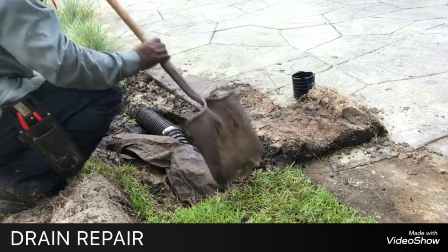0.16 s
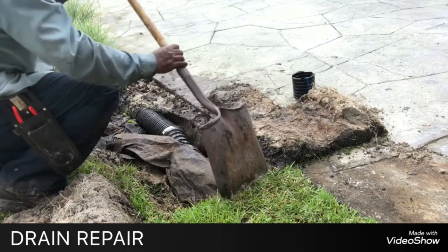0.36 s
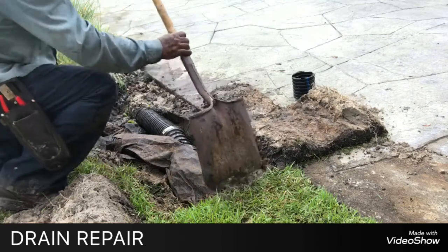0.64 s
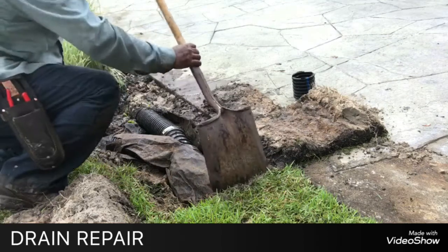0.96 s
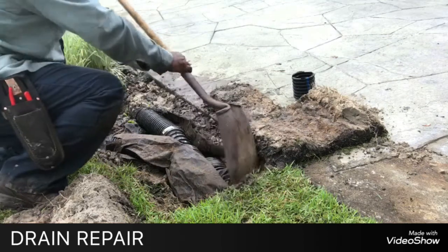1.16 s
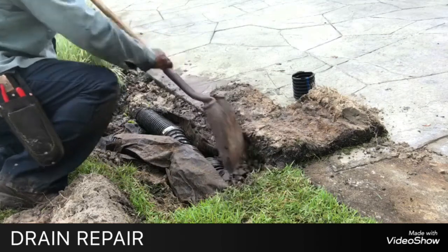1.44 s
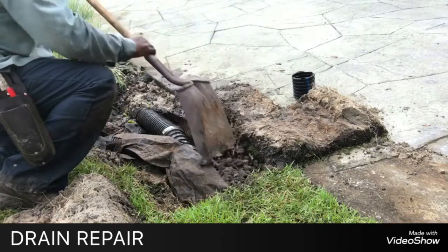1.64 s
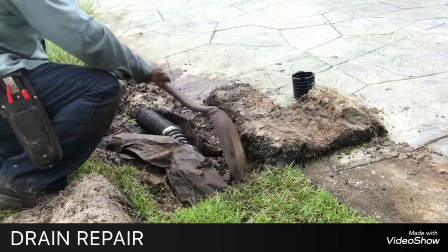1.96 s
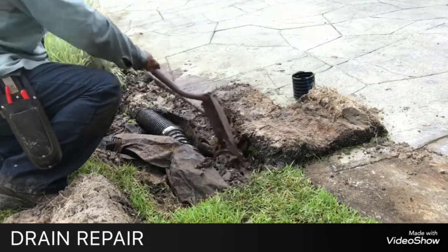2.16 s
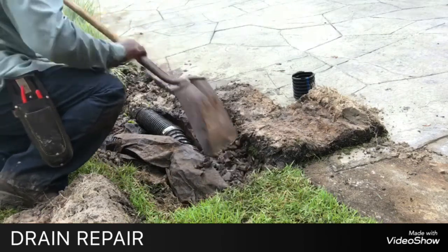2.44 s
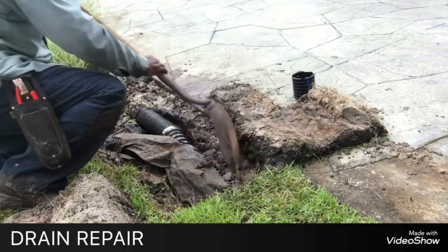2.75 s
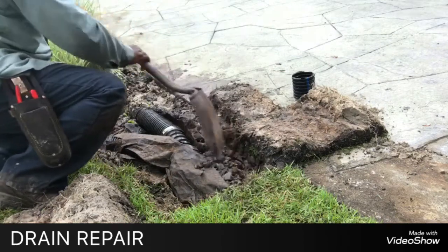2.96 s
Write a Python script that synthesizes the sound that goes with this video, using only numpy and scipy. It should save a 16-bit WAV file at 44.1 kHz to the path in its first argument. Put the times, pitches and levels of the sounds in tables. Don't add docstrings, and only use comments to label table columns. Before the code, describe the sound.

A steel shovel scrapes gritty soil, close and dry, outdoors. Faint scuffs come first, then a hard double knock near 0.85 seconds and a rasping, ringing drag from 1.05 to 1.6. Clods crumble and thump softly on hollow pipe around 1.7. Another scrape runs 1.9 to 2.3, then quiet pattering; loud clanking strokes start at 2.7 and last to the end. Distant engines hum over faint traffic and breeze.

```python
import sys
import numpy as np
from scipy import signal
from scipy.fft import rfft, irfft, next_fast_len
from scipy.io import wavfile
from scipy.ndimage import uniform_filter1d, map_coordinates

SR = 44100
rng = np.random.default_rng(int(sys.argv[2]) if len(sys.argv) > 2 else 0)


def magnitude_from_level(level_db):
    exponent = np.asarray(level_db, float) / 20
    return 10 ** exponent


def to_wav(s):
    ch = np.atleast_2d(s).T
    pcm = np.round(np.clip(ch, -1, 1) * 32767)
    wavfile.write(sys.argv[1], SR, pcm.astype(np.int16))


N = 136710
TIME = np.arange(N) / SR

# pitch in Hz, width in Hz, level in dB.
BLADE_MODES = [(2060, 50, 1), (1900, 42, -8), (2400, 70, -4), (2883, 90, -7.5), (3260, 50, -0.5),
               (3490, 34, -5), (4003, 56, -2), (4560, 77, -0.5), (5370, 110, 2.5), (5800, 89, 1),
               (6350, 53, -1.5), (8180, 190, -12), (9600, 210, -0.5)]
# frequency in Hz, level in dB per Hz.
GRIT_COLOUR = [(200, -21.5), (500, -15.5), (900, -10), (1500, -5.5), (2300, -6), (5500, -7.5),
               (8000, -14.5), (15800, -17.5)]
TREBLE_DB, RING_DB, SOIL_DB, OTHERS_DB = range(1, 5)
OTHER_MODES_DB = -8


def scraping():
    # time in
    # seconds, pressure in dB.
    strokes = [
        [(0, -55), (.2, -57.5), (.25, -80)],
        [(.33, -62), (.36, -55), (.45, -59)],
        [(.462, -43), (.5, -44.5), (.53, -47.5), (.545, -66)],
        [(.59, -60), (.63, -53.5), (.7, -65), (.76, -78)],
        [(.834, -35), (.87, -21.5), (.89, -45.5), (.93, -40.5)],
        [(.93, -48.5), (1.09, -35), (1.13, -26), (1.17, -24), (1.22, -22.5), (1.25, -19), (1.3, -23),
         (1.34, -28), (1.45, -33)],
        [(1.45, -37), (1.48, -27), (1.56, -25.5), (1.59, -36), (1.63, -65)],
        [(1.63, -45.5), (1.75, -40.5), (1.91, -57)],
        [(1.917, -26), (1.935, -22.5), (1.95, -40), (1.98, -28), (2.01, -40), (2.03, -24.5), (2.09, -25.5),
         (2.14, -20.5), (2.19, -25.5), (2.27, -29.5), (2.31, -47.5)],
        [(2.31, -49.5), (2.495, -50), (2.52, -55.5), (2.6, -69), (2.71, -48.5)],
        [(2.715, -77), (2.73, -24), (2.81, -21.5), (2.83, -14), (2.85, -18), (2.87, -31), (2.9, -31)],
        [(2.9, -37), (3.0, -27.5), (3.015, -23), (3.026, -27), (3.05, -19), (3.1, -33)],
    ]
    # frequency in Hz, level in dB per Hz.
    soil_colour = [(150, -8.5), (350, 2), (600, 2), (1200, 0.5), (3000, -39)]
    pressure = np.zeros(N)
    for stroke in strokes:
        s, db = np.transpose(stroke)
        pressure += magnitude_from_level(np.interp(TIME, s, db, left=-150, right=-150))
    unevenness_db = 1.17 * wobble(55) + 0.78 * wobble(290)
    force = pressure * grit(rate=4000, spread_db=4) * magnitude_from_level(unevenness_db - 5.5)
    rasp = patchy(coloured(force, GRIT_COLOUR), depth_db=3.5)
    ringing = blade(force * magnitude_from_level(load(RING_DB, TIME)), force * magnitude_from_level(load(OTHERS_DB, TIME)))
    rumble = pressure * magnitude_from_level(load(SOIL_DB, TIME) + 3.15 * wobble(90)) * rng.standard_normal(N)
    return rasp + ringing + coloured(rumble, soil_colour)


def blade(main_force, other_force):
    (main_hz, main_width, main_db), *others = BLADE_MODES
    other_ring = np.zeros(N)
    for hz, width, db in others:
        other_ring += resonant(other_force * magnitude_from_level(db + 1.8 * wobble(22.12)), hz, width)
    main_ring = resonant(main_force * magnitude_from_level(main_db), main_hz, main_width)
    return main_ring + magnitude_from_level(OTHER_MODES_DB - 9.5) * other_ring


def load(column, t):
    # time in seconds, treble of fine sand in dB, ring of the main mode in dB, rumble of heavy soil in
    # dB, ring of the other modes in dB.
    load_rows = [(.2, 3, -17, -7, 0), (.5, 3, 0, -11.5, -6), (.9, 0.5, -33, -13.5, 3),
                 (1.06, 0.5, -4, -1.5, -6), (1.13, -2.5, -6, -5.5, 5.5), (1.22, 0.5, -7, -16, -4),
                 (1.3, 1, -25, -21, -3.5), (1.5, 4.5, -13, -23.5, -1), (1.7, -6.5, -15, -0.5, -5.5),
                 (2.0, 6, -17, -16.5, 10), (2.25, 2.5, -28, -19.5, -1.5), (2.5, -10.5, -17, 2, 3),
                 (2.72, -2.5, -12, -15, 2.5), (2.83, 5, -21, -22.5, 4), (2.95, 6, -22, -20, 1.5),
                 (3.1, -3, -8, -20, 8.5)]
    columns = np.transpose(load_rows)
    return np.interp(t, columns[0], columns[column])


def grit(rate, spread_db):
    smooth_share = 0.41
    chance, side, size = rng.random((3, N))
    ticks = (chance < rate / SR) * np.sign(side - .5) * magnitude_from_level(-spread_db * np.log(size + 0.012))
    return np.sqrt(1 - smooth_share) * unit(ticks) + np.sqrt(smooth_share) * rng.standard_normal(N)


def stones():
    # start in seconds, peak in dB, pitch in Hz,
    # rise in ms, ping over the blow in dB.
    early_stones = [(.362, -32.5, 3900, .5, -6), (.381, -37, 1440, 1.5, 1), (0.464, -25, 3700, .4, -12),
                    (.485, -27, 2040, 0.53, 2), (0.5199, -22, 2060, 2.4, 1.5), (0.8349, -4, 3600, 0.36, 2),
                    (0.8554, 0.2, 3484, 0.46, 4.5), (0.9831, -16, 3490, 0.54, -8),
                    (1.0533, -15, 3480, 0.48, -3), (1.0605, -11, 4320, 0.78, -6),
                    (1.0925, -6.5, 4660, 2.5, 6.5), (1.1135, -14, 2060, 1.5, 11.5),
                    (1.126, -7, 2080, 1.4, 5.5), (1.1411, -1.5, 2230, 1.3, -1), (1.1935, -4, 2030, 3, 0),
                    (1.229, -3.5, 5200, 0.5, -9), (1.2377, 0.5, 2294, 3, 5), (1.2427, -8, 2310, 1.3, 5),
                    (1.268, -5.5, 5100, 0.36, -10), (1.284, -6, 5300, 0.45, -6),
                    (1.293, -3.5, 2330, 1.2, -8), (1.636, -20, 2060, 0.59, -3)]
    late_stones = [(1.9199, -2.5, 5260, 0.17, 2), (1.9263, -13, 2650, .6, -2),
                   (1.9949, -4.5, 6350, 0.52, -3), (2.0161, -5, 4930, 0.25, 5), (2.025, -8, 2290, .7, -4),
                   (2.0325, -6, 2090, .5, -4), (2.049, -13.5, 5550, .4, 8), (2.0633, -5.5, 6330, 0.62, 3.5),
                   (2.262, -22.5, 1438, 4.7, 11.5), (2.7155, -13, 8500, 1, 2), (2.7289, 5, 2060, 0.18, -3),
                   (2.737, -5, 2060, 0.48, 5.5), (2.7506, -0.5, 9600, .3, -1.5), (2.792, -2, 5400, .9, 5.5),
                   (2.817, -8, 8200, 1.5, 10), (2.8227, -3, 1930, .2, 5), (2.8246, -4, 1840, 1.1, 4),
                   (2.836, -9, 3900, 1.8, 6), (2.84, -3, 2400, 0.46, -11), (2.8705, -15, 1850, 1.42, 6),
                   (2.931, -16.5, 4050, .6, 1), (3.0105, -21, 2070, 2, 3), (3.029, -13, 6800, 1.7, 2),
                   (3.037, -5, 5400, 1.7, 7.5), (3.043, -1.5, 5460, 1.35, 4), (3.065, -13, 3210, .7, 5),
                   (3.075, -7, 4000, 0.7, 1)]
    rasp_s, ping_s, crack_s = 0.026, 0.052, .003
    crush = 1.55
    buried_db = 0.41
    force, tones = np.zeros((2, N))
    rough = grit(rate=12000, spread_db=1.7)
    mode_hz, width, mode_db = np.transpose(BLADE_MODES)[:, :, None]
    for s, db, hz, rise_ms, ping_db in list(early_stones) + list(late_stones):
        rise_s = rise_ms / 1000
        i, t, rasp = fall(s, db - 16, rasp_s, rise_s, crush)
        span = slice(i, i + len(t))
        crack = fall(s, db - 8 - 6 * rise_ms, crack_s, 5e-5)[2]
        burst = (rasp + crack) * rough[:len(t)]
        force[span] += burst

        strengths = magnitude_from_level(mode_db + 3.1 * rng.standard_normal(mode_db.shape))
        signs = np.sign(rng.random(mode_db.shape) - .5)
        decays = np.exp(-np.pi * width * t)
        modes = (strengths * signs * decays * np.sin(2 * np.pi * mode_hz * t)).sum(axis=0)
        strike = fall(s, db - 24, 1, 0.00024 + rise_s)[2] * modes

        ring_s = ping_s * np.sqrt(BLADE_MODES[0][0] / hz) * magnitude_from_level(-buried_db * max(db + 17.5, 0))
        ping = fall(s, db - 9 + ping_db, ring_s, 0.0019 + rise_s)[2] * np.sin(2 * np.pi * hz * t)
        contact = magnitude_from_level(ping_db - 6) * resonant(burst, hz, 0.096 * hz)
        tones[span] += contact + ping + strike
    return magnitude_from_level(-3.5) * patchy(coloured(force, GRIT_COLOUR), depth_db=2.5) + tones


def clods():
    # start in seconds, crumble in dB, thump on the pipe in dB, pitch in Hz.
    clod_rows = [(1.4288, -39, -24, 396), (1.604, -17.5, -38, 1420), (1.668, -23, -27, 610),
                 (1.7125, -18.5, -25, 432), (1.727, -12, -25, 380), (1.749, -16, -18, 570),
                 (1.7584, -17, -22, 700), (1.793, -28, -28, 477), (1.8124, -19.5, -50, 371),
                 (1.8497, -20.5, -51, 1450), (1.8612, -45, -20, 576), (1.869, -25.5, -24, 810),
                 (1.9304, -10.5, -20.5, 590), (2.312, -24.5, -35, 563), (2.373, -21, -32.5, 544),
                 (2.4196, -23.5, -24.5, 990), (2.4295, -34, -25.5, 546), (2.4597, -26.5, -44, 641),
                 (2.4706, -45, -29, 1042), (2.483, -25.5, -51, 906), (2.543, -26, -32.5, 1050),
                 (2.6058, -34, -34.5, 800), (2.4, -26, -40, 900), (2.835, -10, -16.5, 316),
                 (2.845, -17, -15.5, 700)]
    crumble_s, thump_s = 0.026, 0.023
    crumbs, thumps = np.zeros((2, N))
    rough, dull = grit(rate=5000, spread_db=7.6), rng.standard_normal(N)
    for s, crumble_db, thump_db, hz in clod_rows:
        i, t, crumble = fall(s, crumble_db - 8.5, crumble_s, 0.0017, 1.23)
        span = slice(i, i + len(t))
        crumbs[span] += crumble * rough[span]
        thump = fall(s, thump_db + 5, thump_s, 0.0044)[2]
        thumps[span] += resonant(thump * dull[span], hz, .5 * hz)
    patter = patchy(coloured(crumbs, GRIT_COLOUR), depth_db=3.5)
    pipe = coloured(thumps, [(150, 4), (300, 26.5), (2000, 24), (20000, -24)])
    return patter + magnitude_from_level(-9.0) * pipe


def fall(s, db, t60, attack_s, shape=1):
    start = round(s * SR)
    t = np.arange(min(SR // 6, N - start)) / SR
    decay = magnitude_from_level(db - 60 * (t / max(t60, .004)) ** shape)
    return start, t, decay * (1 - np.exp(-t / max(attack_s, 1e-5)))


def ground(x):
    t = np.arange(SR // 4) / SR
    decay = rng.standard_normal(len(t)) * magnitude_from_level(-60 * t / 0.12)
    tail = coloured(np.pad(decay, (300, N)), [(4000, 18), (16000, -22)])[:len(t)]
    return signal.fftconvolve(x, tail / np.linalg.norm(tail))[:N]


def engine():
    # time in seconds, pitch in Hz, level in dB, overtone level in dB.
    engine_rows = [(0, 138.5, -46, -45.5), (.3, 139.4, -52, -57.5), (.9, 140.3, -57.5, -61.5),
                   (1.4, 139.6, -56.5, -51.5), (1.6, 141.4, -44, -53.5), (1.8, 141.3, -42.5, -53.5),
                   (2.5, 142.7, -35.5, -52), (2.63, 142.3, -35, -57.5), (2.77, 141.5, -39.5, -62),
                   (3.1, 142.8, -40.5, -52)]
    second_hz, second_db, leaving_db_per_s = 131.4, -50, 3.5
    s, hz, db, over_db = np.transpose(engine_rows)
    phase = 2 * np.pi * np.cumsum(np.interp(TIME, s, hz) + 1.3 * wobble(9)) / SR
    note = magnitude_from_level(np.interp(TIME, s, db) + 0.29 * wobble(9.3)) * np.sin(phase)
    overtone = magnitude_from_level(np.interp(TIME, s, over_db) + 0.83 * wobble(4.27)) * np.sin(2 * phase)
    second_level = magnitude_from_level(second_db - leaving_db_per_s * TIME + 2.2 * wobble(2.8))
    second = second_level * np.sin(2 * np.pi * second_hz * TIME + 0.78 * wobble(2.52))
    return np.sqrt(2) * (note + second + overtone)


def yard():
    # frequency in Hz, level in dB per Hz.
    traffic_colour = [(32, -37), (50, 0), (90, -4.5), (190, -6), (300, -12), (380, -19), (600, -49.5)]
    breeze_colour = [(300, -29), (450, -8), (1700, -10.5), (6300, -21.5), (8000, -26), (15800, -45)]
    rumble = unit(coloured(rng.standard_normal(N), traffic_colour)) * magnitude_from_level(-47 + 0.55 * wobble(2.34))
    drone_phase = 2 * np.pi * np.cumsum(53 + 2.6 * wobble(1.7)) / SR
    drone = magnitude_from_level(-51.5 + 6.0 * wobble(4.2)) * np.sin(drone_phase)
    breeze = unit(coloured(rng.standard_normal(N), breeze_colour)) * magnitude_from_level(-58.5 + 1.1 * wobble(7))
    return rumble + drone + breeze


def unit(x):
    return x / np.sqrt(np.mean(x ** 2) + 1e-20)


def wobble(rate):
    return map_coordinates(rng.standard_normal(int(N * rate / SR) + 4), [TIME * rate])


def coloured(x, points):
    m = next_fast_len(N + 8192)
    f, db = np.transpose(points)
    hz = np.fft.rfftfreq(m, 1 / SR)
    gain = magnitude_from_level(np.interp(np.log(hz + 1), np.log(f + 1), db)) + 1e-6
    cepstrum = irfft(np.log(gain / np.sqrt(np.mean(gain ** 2))), m)
    cepstrum[1:m // 2] *= 2
    cepstrum[m // 2 + 1:] = 0
    return irfft(rfft(x, m) * np.exp(rfft(cepstrum)), m)[:N]


def resonant(x, hz, width_hz):
    width_hz = np.clip(width_hz, 10, hz)
    b, a = signal.iirpeak(hz, hz / width_hz, SR)
    return signal.lfilter(b, a, x) * np.sqrt(SR / np.pi / width_hz)


def patchy(x, depth_db):
    hz, t, z = signal.stft(x, SR, nperseg=256)
    field = uniform_filter1d(rng.standard_normal(z.shape), size=4, axis=0)
    field = uniform_filter1d(field, size=7, axis=1)
    treble = np.clip((hz[:, None] - 5500) / 3000, 0, 1) * load(TREBLE_DB, t)
    return signal.istft(z * magnitude_from_level(depth_db * unit(field) + treble), SR, nperseg=256)[1][:N]


def scene():
    near = scraping() + stones() + clods()
    return (near + magnitude_from_level(-17.5) * ground(near) + engine() + yard())[None]


def roll_off(x):
    return signal.sosfilt(signal.butter(12, 16840, fs=SR, output="sos"), x)


def record(dry):
    top_hz = 15750
    m = next_fast_len(N + 4096)
    soft = dry / (1 + np.abs(dry / 1.05) ** 8) ** .125
    mix = irfft(rfft(soft, m) * (np.fft.rfftfreq(m, 1 / SR) < top_hz), m)[..., :N]
    return roll_off(mix)


dry = scene()
out = record(dry)
to_wav(out)
```